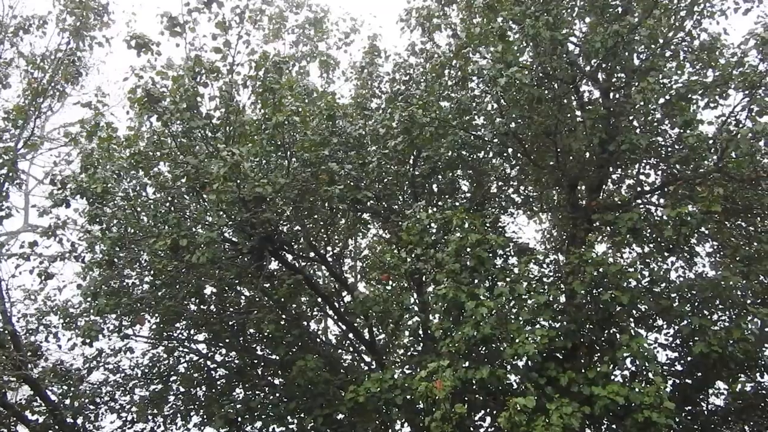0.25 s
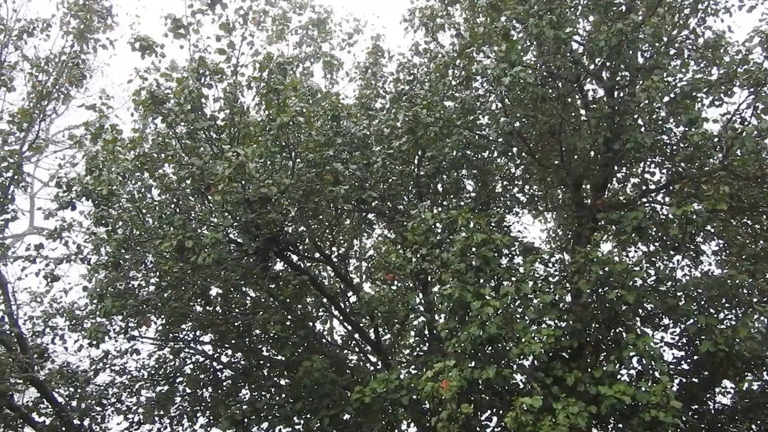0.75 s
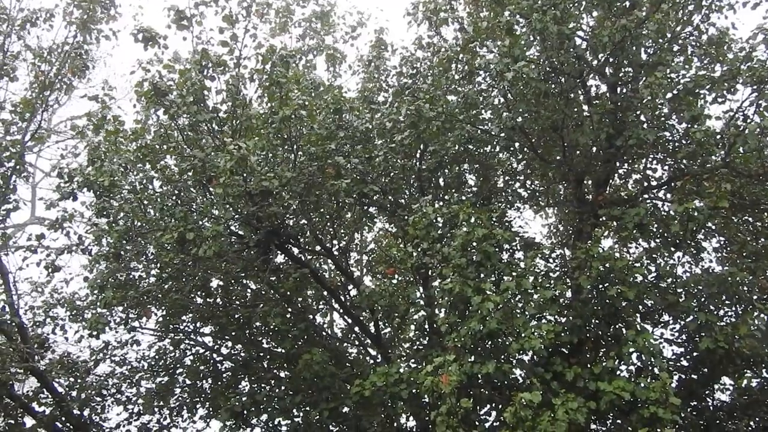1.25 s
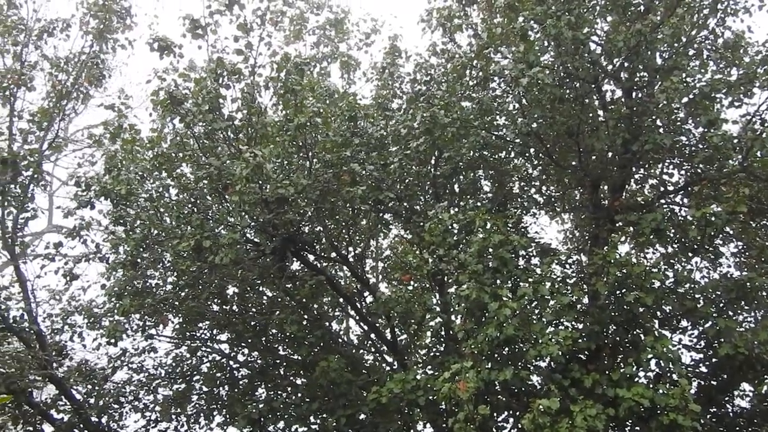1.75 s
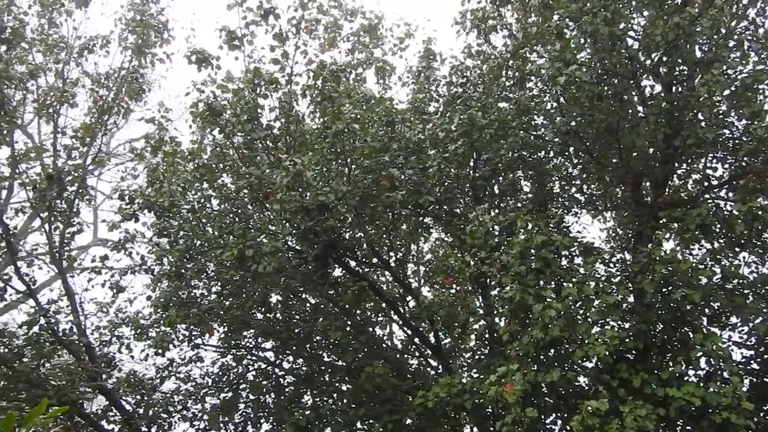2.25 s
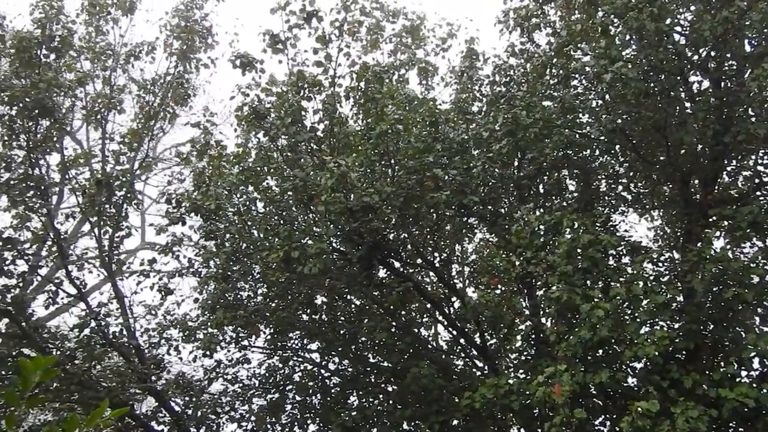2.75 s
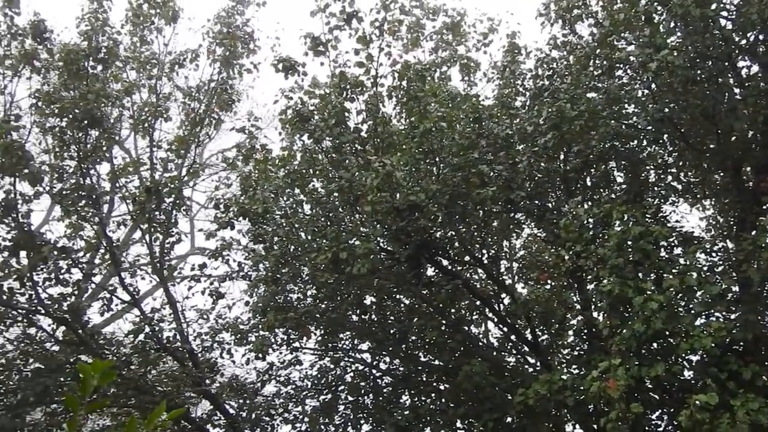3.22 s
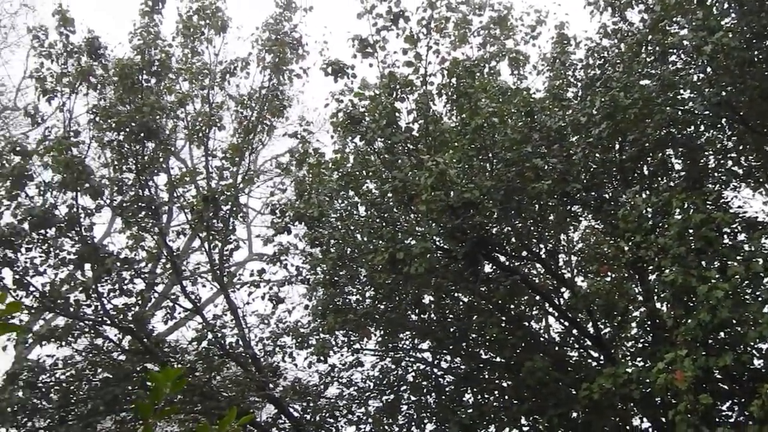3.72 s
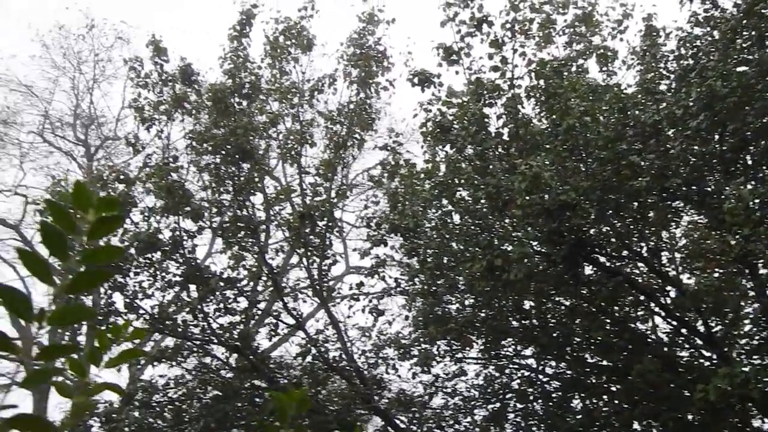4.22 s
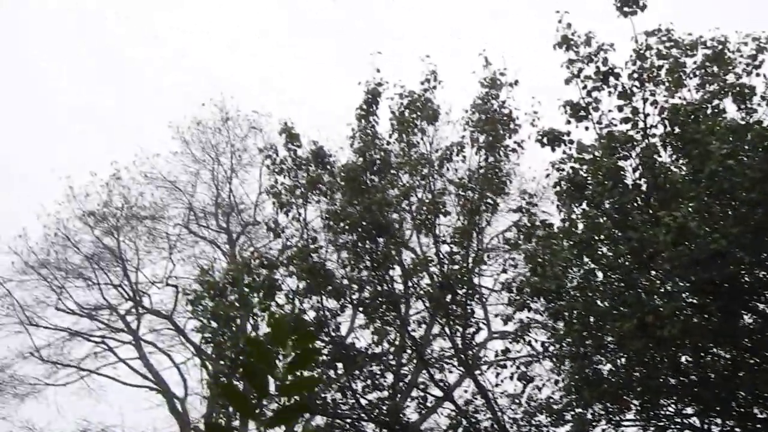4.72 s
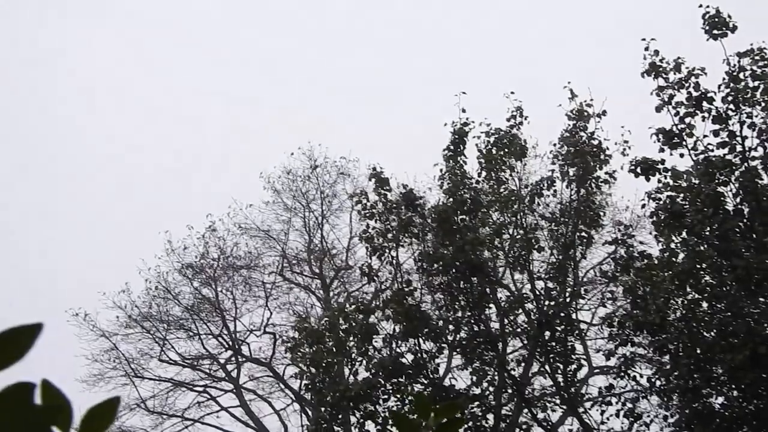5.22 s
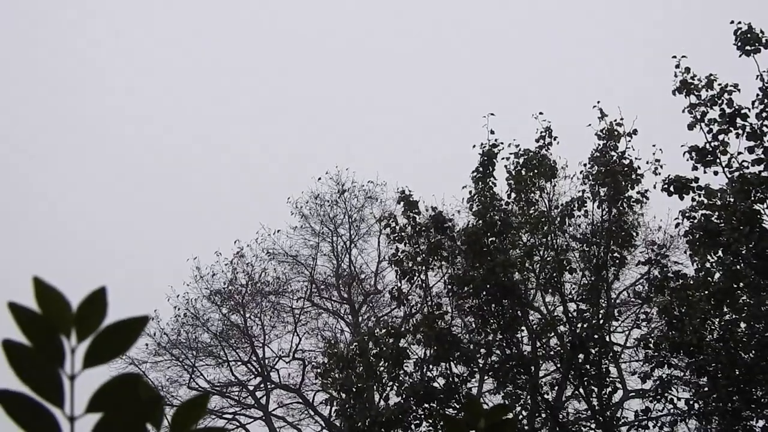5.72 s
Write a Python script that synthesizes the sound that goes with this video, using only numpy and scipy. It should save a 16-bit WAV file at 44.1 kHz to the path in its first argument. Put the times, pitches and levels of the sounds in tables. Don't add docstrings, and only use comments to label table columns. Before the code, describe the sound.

Stereo handheld outdoor capture: jays in treetops give harsh, nasal, rasping screeches, each about a third of a second. One weak call at about one and a half seconds precedes a steady volley from just before two seconds to after five. Leaves blur them with short airy echo. Distant traffic and thin hiss lie far beneath, two small ticks come early, and a hand knocks the camera softly near the end.

```python
import sys
import numpy as np
from scipy import signal
from scipy.fft import rfft, irfft, next_fast_len
from scipy.io import wavfile
from scipy.ndimage import uniform_filter1d, minimum_filter1d, map_coordinates

SR = 44100
rng = np.random.default_rng(int(sys.argv[2]) if len(sys.argv) > 2 else 0)


def field_ratio(decibels):
    return 10 ** (np.asarray(decibels, dtype=float) / 20)


def store_pcm(level_fs):
    pcm = np.round(np.clip(level_fs, -1, 1) * 32767).astype(np.int16)
    wavfile.write(sys.argv[1], SR, np.atleast_2d(pcm).T)


N = 263277

# start_s, length_s, top_pitch_hz, top_after_s, pitch_share_lost_by_end [0-1]
CALLS = [(-0.03, 0.34, 906.6, 0.058, 0.18), (1.486, 0.36, 911.5, 0.04, 0.14),
         (1.879, 0.38, 914.2, 0.089, 0.17), (2.514, 0.37, 903, 0.054, 0.23),
         (2.777, 0.35, 918.3, 0.088, 0.19), (2.905, 0.38, 915, 0.036, 0.17),
         (3.201, 0.36, 892.6, 0.033, 0.19), (3.562, 0.41, 898.6, 0.04, 0.182),
         (3.7, 0.32, 908, 0.091, 0.17), (4.017, 0.36, 903, 0.0074, 0.229), (4.418, 0.39, 899, 0.037, 0.16),
         (4.471, 0.34, 898.2, 0.12, 0.152), (4.853, 0.35, 877.6, 0.026, 0.15),
         (5.304, 0.33, 900, 0.088, 0.16)]
# arch_power [1 pointed, 2 round], breath_onset_s
SHAPES = [(2.1, 0.0057), (1.6, .012), (1.9, 0.026), (1.6, 0.011), (1.6, 0.019), (1.4, 0.008), (1.6, 0.0099),
          (1.6, 0.0027), (1.5, 0.015), (1.6, 0.0084), (1.6, 0.0027), (1.5, 0.023), (1.6, 0.009),
          (1.3, 0.015)]
# level_db, brightness_db, swell_start_to_end_db, throb_depth [0-1]
EFFORT = [(-38, -3.5, 2, .4), (-36, -5.5, -10.5, .4), (-17, 0.5, -6, 0.23), (-22.5, -2.5, 2.5, 0.33),
          (-18, 0, -10, 0.5), (-24, -1, 16, .27), (-21, -4, -5.5, 0.3), (-22, 1.5, -3, 0.34),
          (-18, -2, -0.5, 0.27), (-22, -2.5, 3.5, 0.33), (-20.5, -3, -4.5, 0.13), (-21, 1, -1.5, 0.43),
          (-20, -5.5, -4, 0.34), (-18.5, 1.5, -1, 0.36)]
# brightness_change_db, third_overtone_db, accent_after_onset_db
HEAD = [(-4.5, -0.5, 5), (2.5, 3, -4), (-0.5, -1.5, -0.5), (-10.5, -1.5, 2), (4.5, -3.5, -0.5),
        (-12.5, -2.5, 9), (6, -4, -1), (-0.5, 4.5, -4.5), (5, -5.5, 0.5), (1, -2, 6), (-2.5, 1.5, -1),
        (-1.5, -5.5, 3), (0.5, -2, 1), (-2, -0.5, -1.5)]
# left_right_db, left_lead_samples, scatter_db
PERCHES = [(10.5, 3, -2.5), (7, 2.5, -5.5), (-1.5, 0.5, -4.5), (1.5, 2.33, -3.5), (-2, 0.16, 1.5),
           (3.5, 1, -6), (1, 0.93, -7), (0.5, 1.18, -11.5), (-4, 0, 6), (1, 1.4, -4), (0, 1.8, -3),
           (-1.5, -1, -3.5), (-.5, 1.3, -2.5), (-3, -2.3, -2.5)]


def jays():
    out = np.zeros((2, N + 2 * SR))
    for (start_s, *shape), form, effort, head, perch in zip(CALLS, SHAPES, EFFORT, HEAD, PERCHES):
        first = round(start_s * SR)
        voice = call(shape, *form, effort, head, flutter_db=2.5)
        voice = voice[max(0, -first):]
        at = max(0, first)
        for path in arrivals(voice, *perch):
            out[:, at:at + path.shape[1]] += path
    return out[:, :N]


# multiple, level_db (against the nearest leading overtones)
OVERTONES = [(1, -17.5), (2, -1.5), (3, -2), (4, 1), (5, -2), (6, 0), (7, -6), (8, -2.5), (9, -14),
             (10, -20), (11, -30), (12, -40), (13, -37), (14, -30), (15, -37), (16, -43)]
# frequency_hz, density_db [dB per Hz]
RASP = [(1200, -38), (2200, -26.5), (2800, -3.5), (3300, -46.5), (4000, -16.5), (5200, -3.5), (6600, -15.5),
        (8000, -12), (10000, -24.5), (13000, -74)]
RASP_DB = -9
JITTER = .02
THROB_HZ = 138.8
AIR_LOSS = .7


def call(shape, bend, onset_s, effort, head, flutter_db):
    t = np.arange(0, shape[0], 1 / SR)
    pitch = arch(t, *shape, bend)
    *breath, throb_depth = effort
    lead_db = leaders(t, pitch, onset_s, head, *breath)
    slack = np.clip((pitch.max() / pitch - 1) / .2, 0, 1)
    turns = np.cumsum(pitch * (1 + JITTER * slack * wobble(len(t), 201.0)[0])) / SR

    k, level_db = np.transpose(OVERTONES)[:, :, None]
    shares = np.array([np.interp(k[:, 0], LEADING, row) for row in np.eye(len(LEADING))])
    level_db = level_db + shares.T @ lead_db + AIR_LOSS * effort[1] * (k > 8.5)
    looseness = 1 + (k > 8) + (k == 5) - .5 * (k == 4)
    level_db = level_db + flutter_db * looseness * wobble(len(t), 30, count=len(k))
    shiver = np.clip(k, 0, 9) * np.sqrt(slack) * wobble(len(t), 150, count=len(k))
    dulling_db = slack * (2 + 6 * np.clip(k - 7, 0, 3))
    level_db = level_db + .5 * shiver - dulling_db

    tone_phase, throb_phase = rng.uniform(0, 1, (2, *k.shape))
    beat = np.cumsum(THROB_HZ * (1 + 0.042 * wobble(len(t), 26.2)[0])) / SR
    depth = np.clip(throb_depth, 0, .6) * np.clip(5 * slack, 0, 1)
    throb = 1 + depth * np.sin(2 * np.pi * (beat + throb_phase))
    tones = np.sin(2 * np.pi * (k * turns + tone_phase))
    voice = np.sum(field_ratio(level_db) * throb * tones, axis=0)

    air = shaped(rng.standard_normal((2, SR // 2)), RASP, [(100, 0.65)])[0, :len(t)]
    burst = 20 * t * np.exp(1 - t / .015)
    loud = np.linalg.norm(field_ratio(lead_db), axis=0)
    leak = 1.22 * slack ** 1.18 * loud + burst * loud.max()
    voice = np.sqrt(2) * voice + field_ratio(RASP_DB) * leak * air
    return voice * np.clip(np.minimum(t / .016, (t[-1] - t) / .008), 0, 1)


JUMP, JUMP_S = .18, 0.012
COLLAPSE, COLLAPSE_S = .08, .02


def arch(t, length, top_hz, crest, fall, bend):
    away = np.abs((t - crest) / (length - crest))
    snap = JUMP * np.exp(-t / JUMP_S)
    collapse = COLLAPSE * np.exp((t - length) / COLLAPSE_S)
    return top_hz * (1 - snap - fall * away ** bend - collapse)


LEADING = [2, 3, 4, 5, 6, 7, 8]
# frequency_hz, gain_db
THROAT = [(2200, -21.5), (2750, -11), (3100, -0.5), (3650, -1.5), (4300, -13.5), (5500, -10.5), (6650, 6),
          (7400, -8)]
ATTACK_DB, RELEASE_DB, RELEASE_S = -20.5, -16, 0.0093
UPPER_LATE, UPPER_EARLY = 1.48, 2.75
ACCENT_S = 0.041


def leaders(t, pitch, onset_s, head, db, bright_db, swell_db):
    turn_db, low_db, accent_db = head
    k, done = np.array(LEADING)[:, None], t / t[-1] - .5
    upper, lower = k > 4, k == 3
    attack_db = ATTACK_DB * np.exp(-t / (onset_s * UPPER_LATE ** upper))
    release_db = RELEASE_DB * np.exp((t - t[-1]) / (RELEASE_S * UPPER_EARLY ** upper))
    accent = accent_db * t / ACCENT_S * np.exp(1 - t / ACCENT_S)
    breath_db = db + swell_db * done + accent + attack_db + release_db
    tilt_db = (bright_db + turn_db * done) * upper + low_db * lower
    return breath_db + along(THROAT, k * pitch) + tilt_db


# frequency_hz, t60_s
LEAVES = [(1500, 0.13), (3500, 0.19), (7000, 0.34), (12000, 0.015)]
# frequency_hz, t60_s
TRUNKS = [(1500, 3.6), (3500, 2.38), (7000, 1.85), (12000, 0.068)]
TRUNK_DB = -22


def arrivals(voice, pan_db, lead, wet_db):
    side = np.array([[.5], [-.5]])
    m = next_fast_len(len(voice) + 64)
    delay = np.exp(2j * np.pi * np.fft.rfftfreq(m) * lead * side)
    direct = irfft(rfft(voice, m) * delay, m)
    near = field_ratio(wet_db) * scatter(voice, LEAVES, size=SR // 5)
    far = field_ratio(TRUNK_DB) * scatter(voice, TRUNKS, size=3 * SR // 4)
    share = field_ratio(1.07) / np.sqrt(1 + field_ratio(wet_db) ** 2)
    return share * field_ratio(pan_db * side) * direct, share * near, share * far


# frequency_hz, left_right_likeness [0-1]
SCATTER_ALIKE = [(1000, 0.86), (3500, 0.89), (7000, 0.49), (12000, .05)]


def scatter(x, decays, size):
    hz, t, z = signal.stft(rng.standard_normal((2, size)), SR, nperseg=256)
    decay = field_ratio(-60 * t / along(decays, hz)[:, None])
    tail = signal.istft(z * decay, SR, nperseg=256)[1]
    tail = shaped(tail, [(100, 0)], SCATTER_ALIKE) / np.sqrt(tail.shape[1])
    return signal.fftconvolve(np.pad(x, (90, 0))[None], tail, axes=1)


# frequency_hz, density_db [dB per Hz]
ECHO = [(2200, -25), (3550, -1.5), (4100, -21), (6600, -9.5), (8600, -68)]
EARLIER_DB, EARLIER_T60_S = -33, 1.6


def earlier_calls():
    t = np.arange(N) / SR
    return field_ratio(EARLIER_DB - 60 * t / EARLIER_T60_S) * rush(ECHO, patchy_db=1.5)


# start_s, peak_db
TWIGS = [
    (.356, -39),
    (.844, -36.5),
]


def twigs():
    out, t = np.zeros((2, N + SR)), np.arange(SR // 4) / SR
    colour = [(3500, -48), (5000, -3), (7500, -4.0), (10000, -64.5)]  # frequency_hz, density_db
    for start_s, db in TWIGS:
        tick = shaped(rng.standard_normal((2, len(t))), colour, ALIKE)
        out[:, round(start_s * SR):][:, :len(t)] += field_ratio(db - 3 - 60 * t / .07) * tick
    return out[:, :N]


# start_s, peak_db, frequency_hz, t60_s
BUMP = [
    (5.549, -16, 119.4, 0.13),
    (5.553, -8, 185, 0.057),
    (5.553, -22, 79.5, 0.24),
]


def camera_bump():
    out, t = np.zeros((2, N + SR)), np.arange(SR // 4) / SR
    for start_s, db, hz, t60 in BUMP:
        envelope = field_ratio(db - 60 * t / t60) * (1 - np.exp(-t / 0.0054))
        out[:, round(start_s * SR):][:, :len(t)] += envelope * np.sin(2 * np.pi * hz * t)
    return out[:, :N]


# time_s, hum_db, traffic_db
BACKGROUND = [(0.0, -42.5, -54), (0.61, -43, -51.5), (1.98, -41.5, -51.5), (2.18, -44.5, -52),
              (2.61, -43.5, -47), (2.91, -43.5, -53), (3.87, -42.5, -45.5), (4.54, -43.5, -50.5),
              (5.01, -43.5, -40.5), (5.27, -40, -45.5), (5.57, -44, -49.5), (5.97, -44.5, -44)]
# frequency_hz, density_db [dB per Hz]
HUM = [(12, -63), (20, -20), (36, -16), (54, -6), (70, -4), (123, 5), (145, -2), (227, -10), (330, -27),
       (430, -60), (730, -120)]
# frequency_hz, density_db [dB per Hz]
TRAFFIC = [(150, -31), (260, -4), (374, -9.5), (467, -9.5), (568, -7.5), (1260, -9), (1590, -16.5),
           (2400, -19.5), (3120, -49), (5280, -120)]
# frequency_hz, density_db [dB per Hz]
WOODS = [(1180, -59), (2000, -18), (2220, -6), (2460, -42), (2630, 0.5), (3670, -3.5), (3970, 0.5),
         (4790, 3.5), (5830, -1.5), (6520, 9), (7870, -11.5), (10500, -15.5), (15500, -16.5)]
HUM_SWAY_DB, WOODS_DB = .6, -53.5


def background():
    time_s, *columns = np.transpose(BACKGROUND)
    hum_db, traffic_db = [np.interp(np.arange(N) / SR, time_s, column) for column in columns]
    hum = field_ratio(hum_db + HUM_SWAY_DB * wobble(N, 9.5)) * rush(HUM, patchy_db=1.5)
    traffic = field_ratio(traffic_db - 0.03) * rush(TRAFFIC, patchy_db=2.5)
    woods = field_ratio(WOODS_DB) * rush(WOODS, patchy_db=2)
    return hum + traffic + woods


# frequency_hz, left_right_likeness [0-1]
ALIKE = [(60, 0.99), (180, 0.96), (550, 0.9), (1650, 0.87), (4970, 0.39), (15000, 0.11)]


def rush(spectrum, patchy_db):
    z = signal.stft(rng.standard_normal((2, N + 512)), nperseg=512)[2]
    field = uniform_filter1d(rng.standard_normal(z.shape[1:]), size=5, axis=0)
    field = uniform_filter1d(field, size=12, axis=1)
    noise = signal.istft(z * field_ratio(patchy_db * unit(field)), nperseg=512)[1][:, :N]
    return shaped(noise, spectrum, ALIKE)


def shaped(pair, spectrum, alike):
    n = pair.shape[1]
    m = next_fast_len(n + 8192)
    hz = np.fft.rfftfreq(m, 1 / SR)
    turn = np.arccos(np.clip(along(alike, hz), -1, 1)) / 2
    coloured = rfft(pair, m) * field_ratio(along(spectrum, hz))
    mid, side = irfft(coloured * [np.cos(turn), np.sin(turn)], m)[:, :n]
    return unit(np.array([mid + side, mid - side]))


def wobble(n, rate, count=1):
    coarse = np.arange(0, n + 16, 16)
    rows = rng.standard_normal(size=(count, 200))
    curves = [map_coordinates(row, [coarse * rate / SR]) for row in rows]
    return np.array([np.interp(np.arange(n), coarse, curve) for curve in curves])


def along(points, hz):
    f, v = np.transpose(points)
    return np.interp(np.log(hz + 1), np.log(f + 1), v)


def unit(x):
    return x / np.sqrt(np.mean(x ** 2) + 1e-20)


def scene():
    return jays() + earlier_calls() + twigs() + camera_bump() + background()


def band_limit(x):
    return signal.sosfilt(signal.butter(12, 15630, fs=SR, output="sos"), x)


def record(dry):
    needed = np.minimum(1, .97 / (np.abs(dry).max(axis=0) + 1e-9))
    gain = uniform_filter1d(minimum_filter1d(needed, size=301), size=301)
    return band_limit(dry * gain)


dry = scene()
out = record(dry)
store_pcm(out)
```